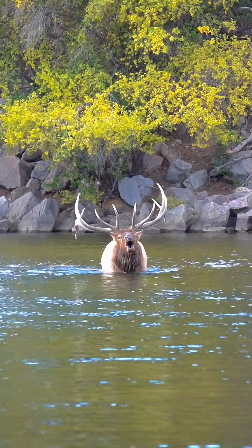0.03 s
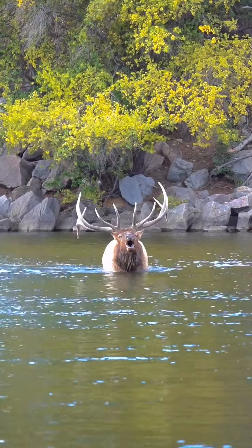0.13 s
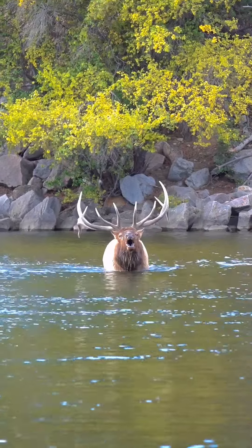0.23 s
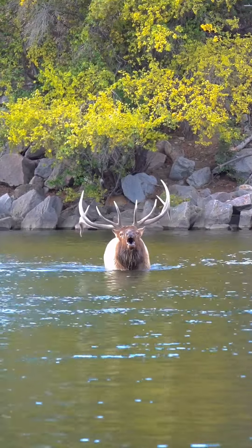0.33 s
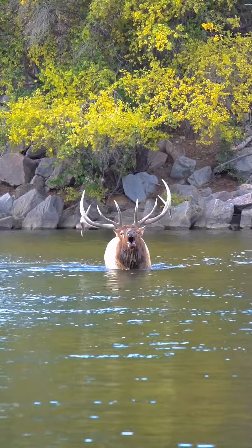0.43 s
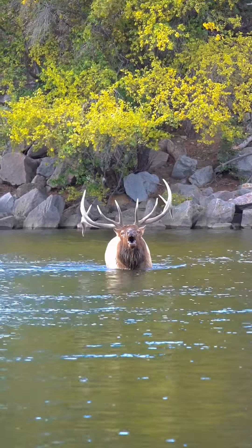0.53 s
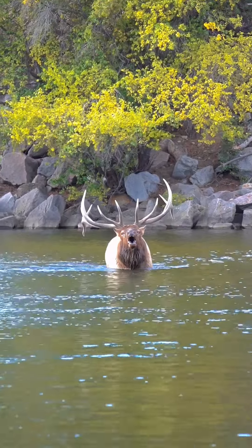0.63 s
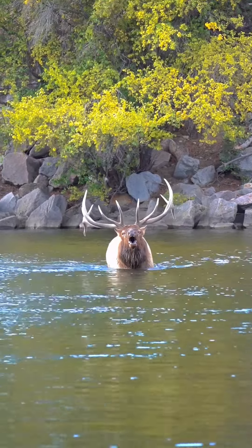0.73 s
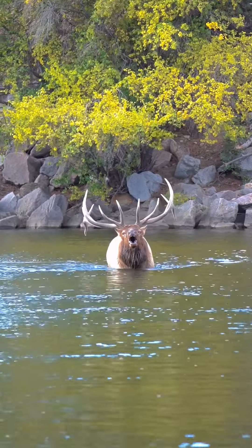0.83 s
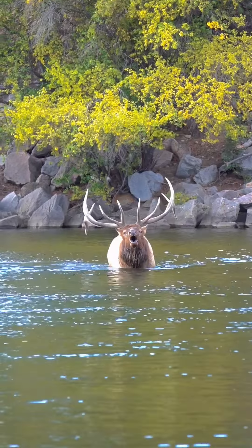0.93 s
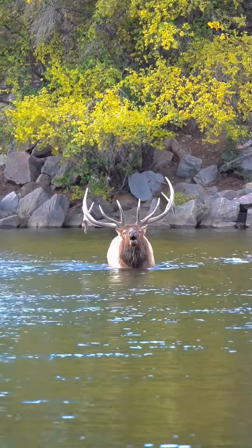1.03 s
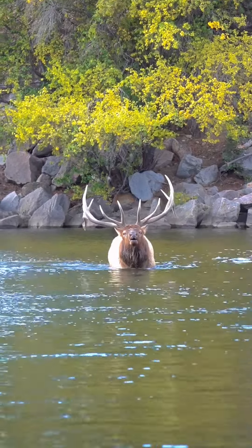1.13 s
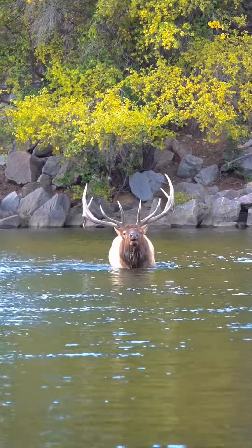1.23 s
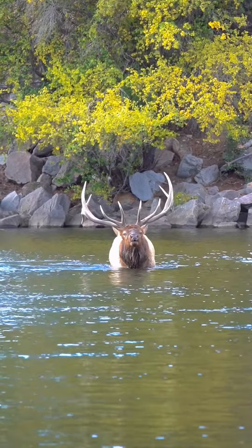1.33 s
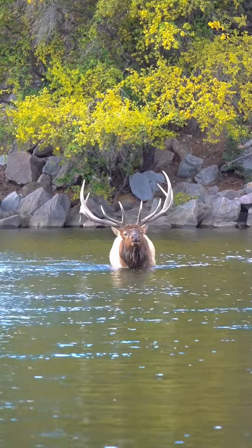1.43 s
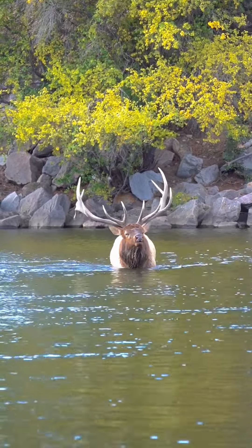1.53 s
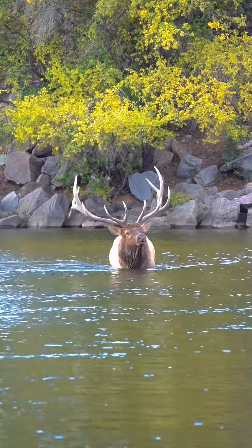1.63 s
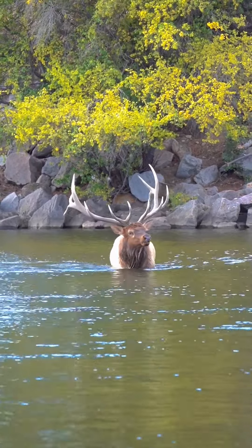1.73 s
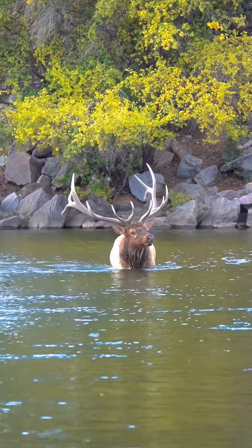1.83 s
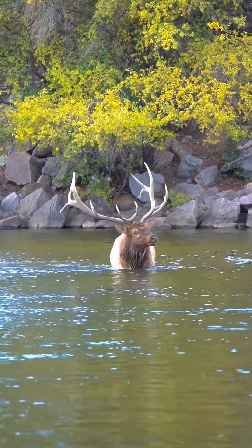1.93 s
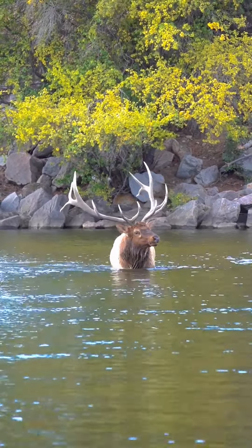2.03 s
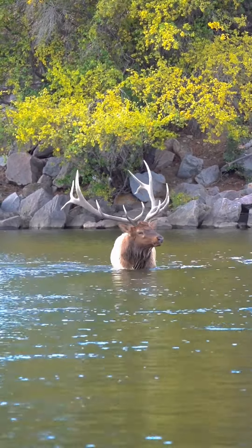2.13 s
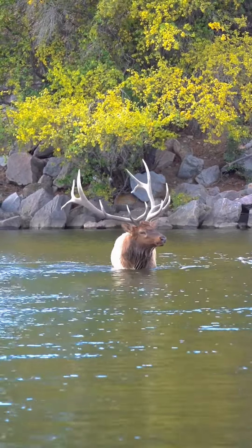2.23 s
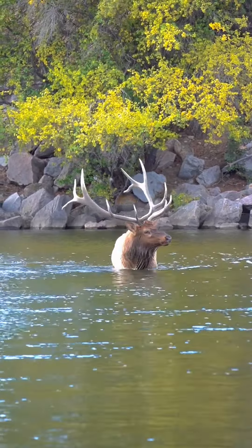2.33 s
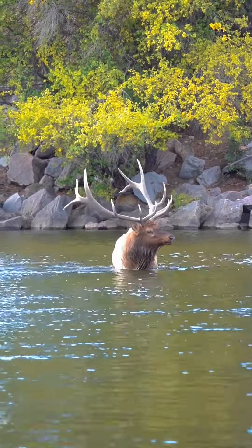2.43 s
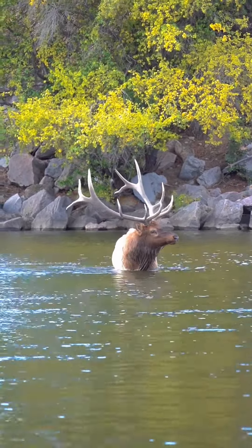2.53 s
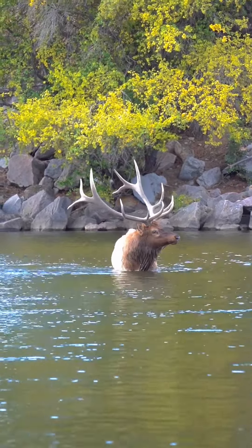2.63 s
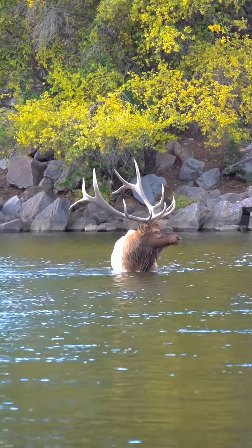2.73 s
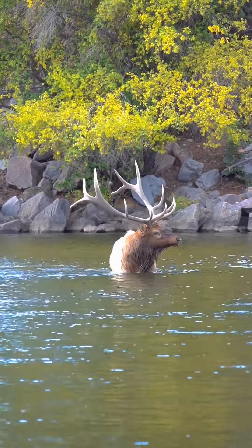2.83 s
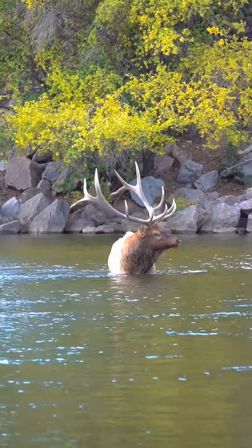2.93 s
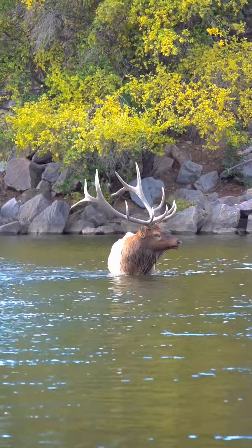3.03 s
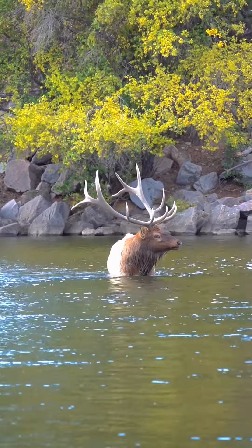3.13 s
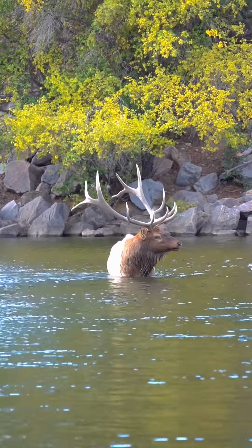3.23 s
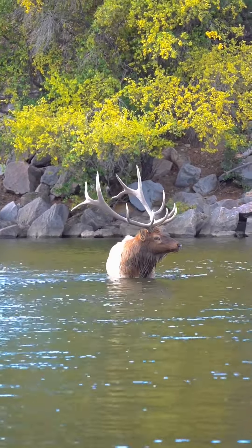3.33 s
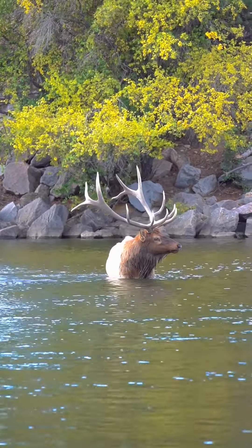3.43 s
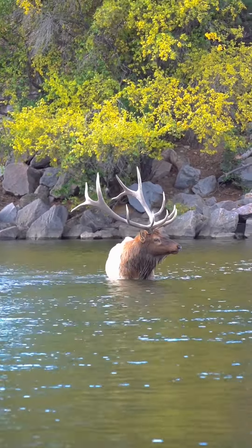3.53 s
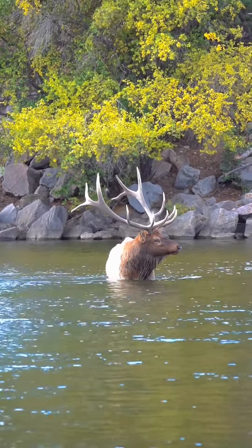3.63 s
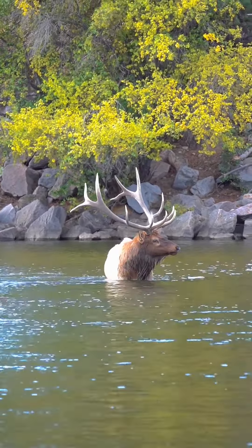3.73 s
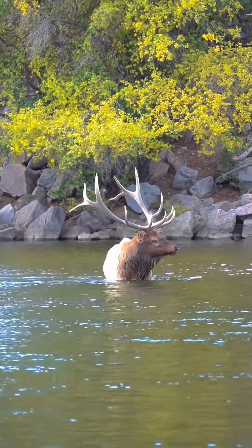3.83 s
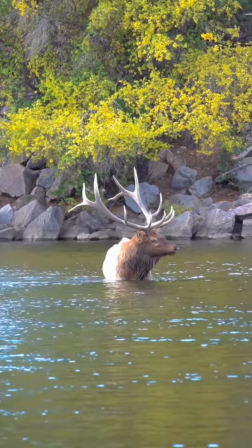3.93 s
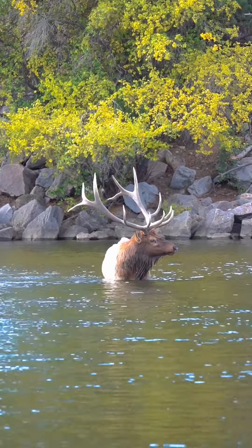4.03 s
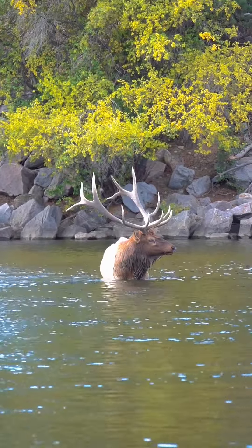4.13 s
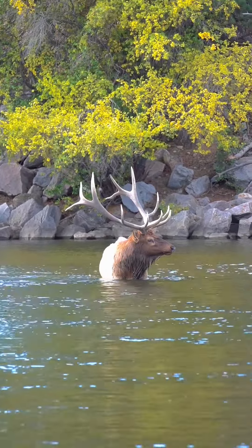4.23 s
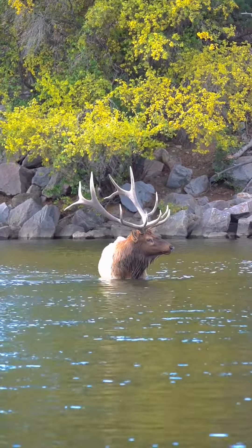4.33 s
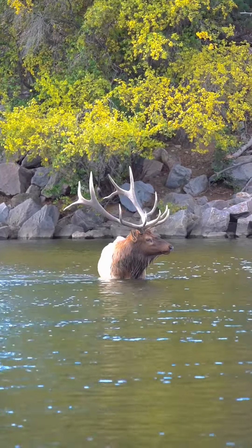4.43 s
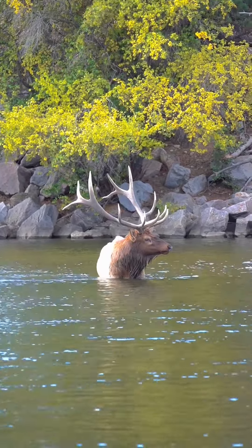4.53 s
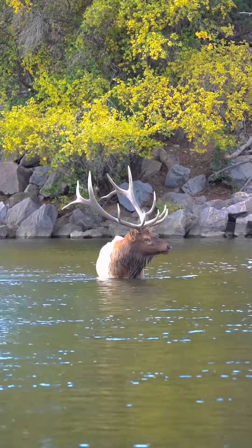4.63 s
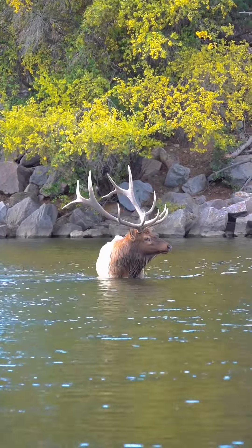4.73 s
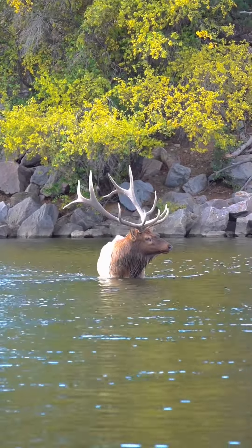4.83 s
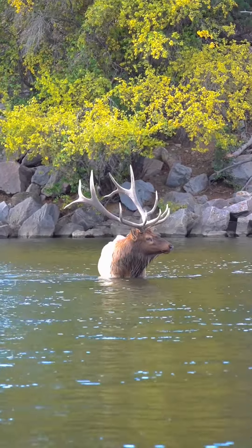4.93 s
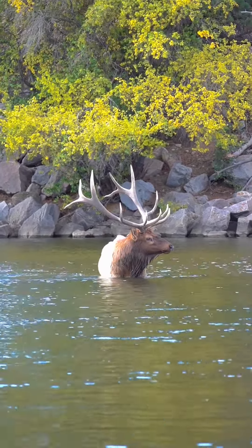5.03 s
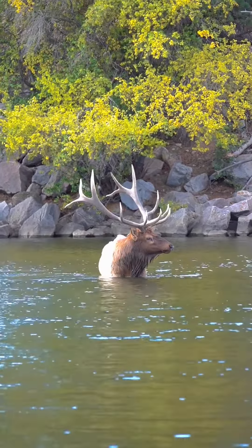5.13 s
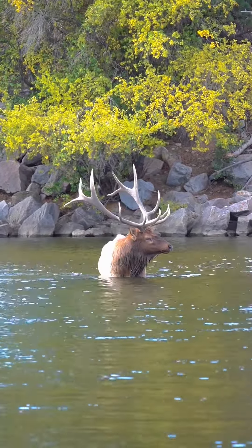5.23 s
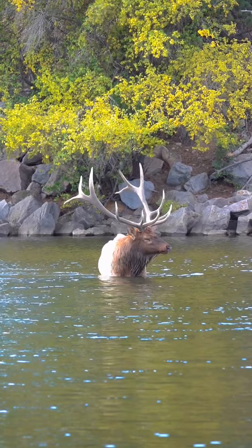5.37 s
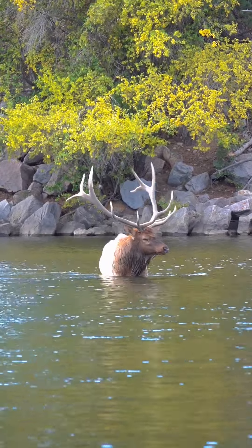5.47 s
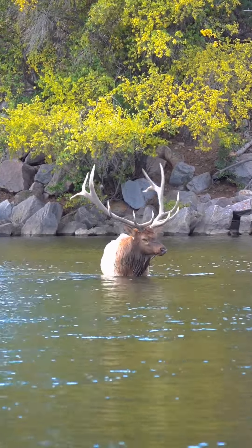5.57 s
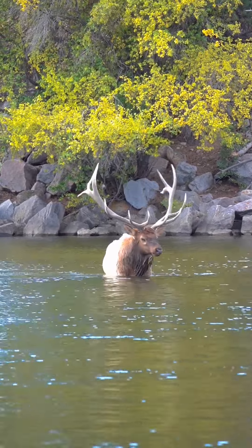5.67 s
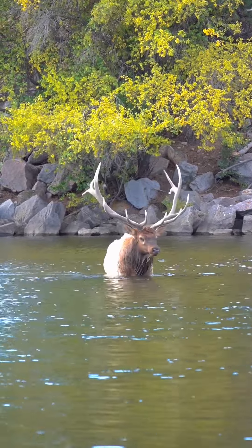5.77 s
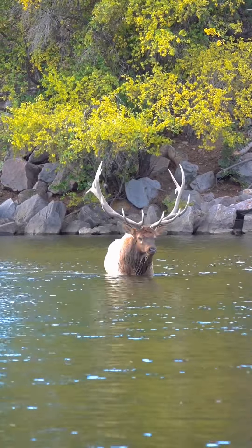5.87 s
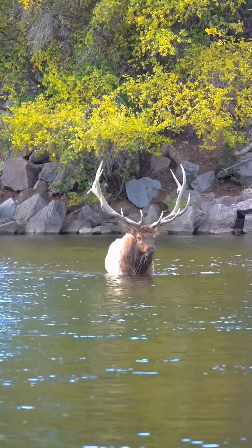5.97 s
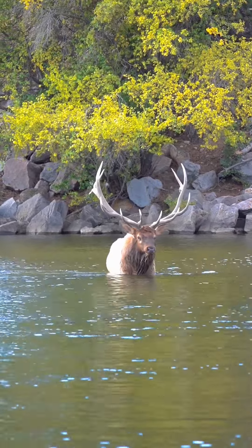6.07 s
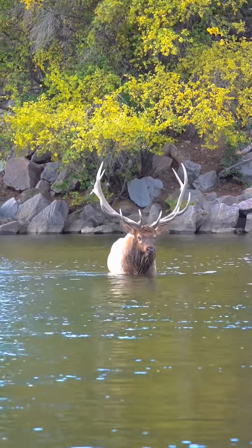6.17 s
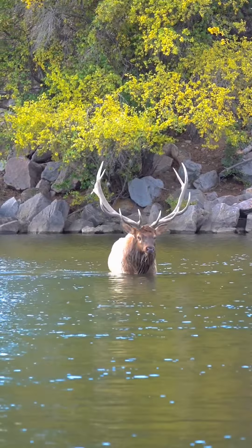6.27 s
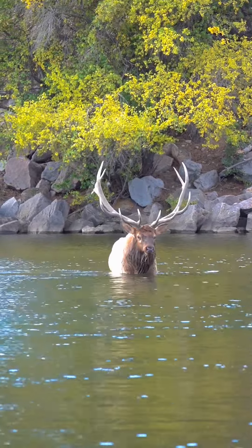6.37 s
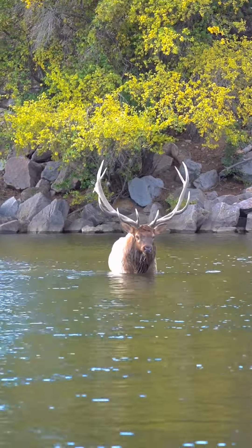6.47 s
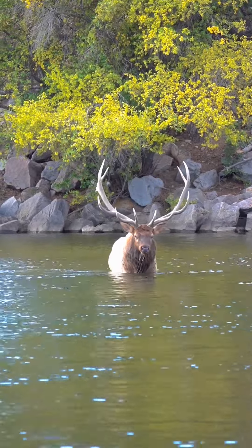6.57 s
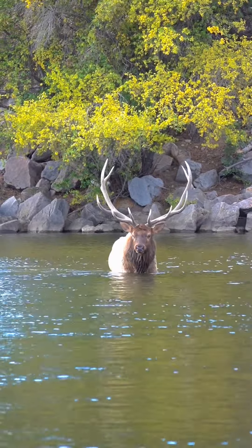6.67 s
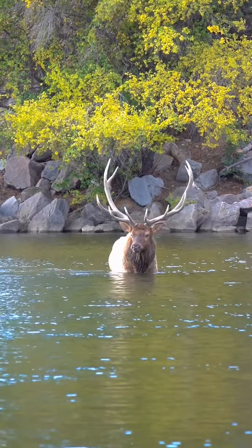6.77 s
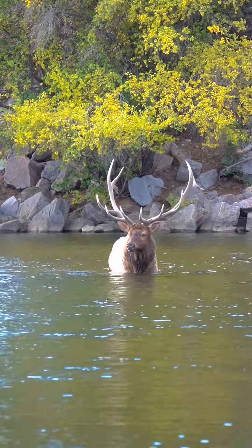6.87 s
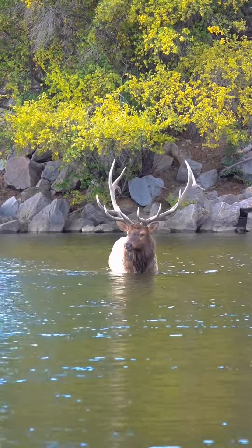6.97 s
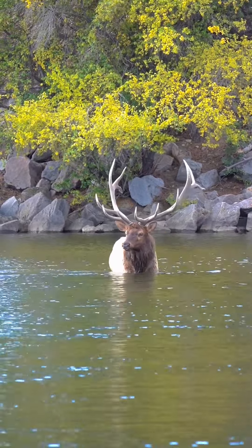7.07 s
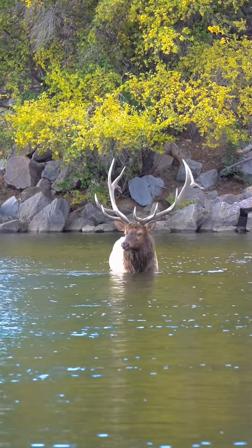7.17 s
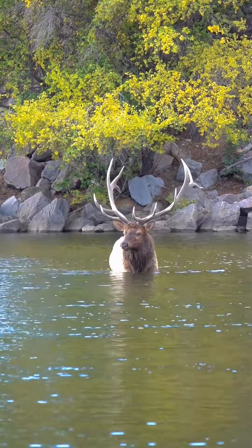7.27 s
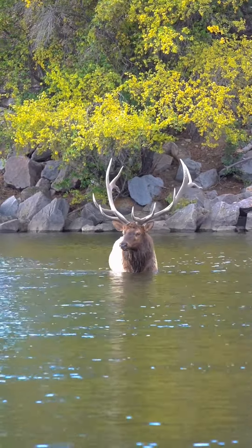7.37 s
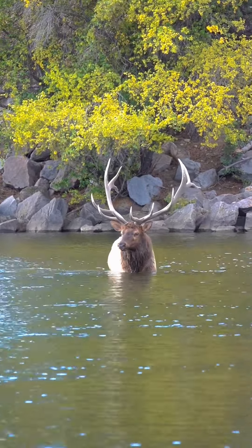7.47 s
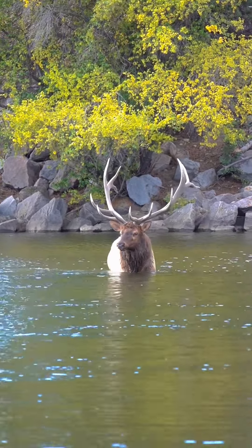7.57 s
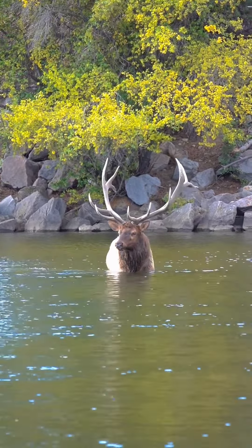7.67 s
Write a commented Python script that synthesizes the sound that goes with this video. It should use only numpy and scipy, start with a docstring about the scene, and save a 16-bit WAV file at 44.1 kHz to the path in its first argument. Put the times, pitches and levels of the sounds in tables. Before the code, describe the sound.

A bull elk's breathy, high nasal whistle holds, then drops into a low moan and grunt, echoing across water over faint distant traffic.

```python
"""Bull elk calling at a lake

A bull elk standing in a lake ends its bugle: a breathy nasal whistle drops into a low moan and a grunt.
The whistle is a wavering tone with harmonics and breath noise; the moan is pulses shaped by the throat.
The grunt is short rings and a rush of air. Rocky banks return all three as scattered echoes.
Behind are far traffic (noise and engine drones), insects (narrow wandering tones), a small bird
(short arches of harmonics) and a puff of wind on the microphone ports (low noise)."""
import sys
import numpy as np
from scipy import signal
from scipy.fft import rfft, irfft, next_fast_len
from scipy.io import wavfile
from scipy.ndimage import uniform_filter1d

SR = 44100
rng = np.random.default_rng(int(sys.argv[2]) if len(sys.argv) > 2 else 0)


def wav_record(signal):
    """Record a signal, one row per channel, as 16-bit PCM in the file named by sys.argv[1]."""
    frames = np.transpose(np.atleast_2d(signal))
    bounded = np.clip(frames, -1, 1)
    # unit amplitude maps onto the largest positive 16-bit level
    quanta = np.round(bounded * 32767).astype(np.int16)
    wavfile.write(sys.argv[1], SR, quanta)


N = 339570
LEAD = 44100      # samples of call before time zero, whose echoes still arrive


def from_db(db):
    """Turn decibels into a gain."""
    return 10 ** (np.asarray(db) / 20)


def rms_one(x):
    """Scale a sound to an average (rms) level of 1."""
    return x / np.sqrt(np.mean(x ** 2) + 1e-20)


def in_time(rows, lead=0):
    """Draw each column of a table as a line through time."""
    s, *columns = np.transpose(rows)
    t = np.arange(-lead, N) / SR
    return [np.interp(t, s, column) for column in columns]


def at_hz(points, hz):
    """Read a (frequency, value) table at any frequency, on a logarithmic frequency scale."""
    table_hz, values = np.transpose(points)
    return np.interp(np.log(hz), np.log(table_hz), values)


def sounding(rows, fade_s=.012, from_start=False):
    """1 while a table lasts, fading at its ends; from_start leaves out the fade-in."""
    t = np.arange(-LEAD, N) / SR
    fade_out = np.clip((rows[-1][0] - t) / fade_s, 0, 1)
    if from_start:
        return fade_out
    return fade_out * np.clip((t - rows[0][0]) / fade_s, 0, 1)


def drift(rate, size=N):
    """A smooth random line of spread 1; a higher rate [changes per s] moves faster."""
    # made at one fortieth of the sample rate, then joined by straight lines
    r = np.exp(-80 * np.pi * rate / SR)
    noise = rng.standard_normal(size // 40 + 2002)
    slow = signal.lfilter([1], [1, -2 * r, r * r], noise)[2000:]
    return np.interp(np.arange(size) / 40, np.arange(len(slow)), rms_one(slow))


def swells(centres, halves, levels_db):
    """Add bell-shaped rises and falls into one gain curve."""
    t = np.arange(N) / SR
    bells = np.broadcast(centres, halves, levels_db)
    return sum(from_db(db) * np.exp(-((t - s) / half) ** 2) for s, half, db in bells)


def stereo(mid, side, alike):
    """Mix two independent noises so that left and right are alike by a chosen share."""
    return np.sqrt(1 + alike) * mid + np.sqrt(1 - alike) * side * [[1], [-1]]


def narrow_noise(hz, width_hz, alike, size=N):
    """A few unsynchronised sources: a tone that wanders in a narrow band about a moving pitch."""
    lowpass = signal.butter(2, width_hz, fs=SR, output="sos")
    slow = signal.sosfilt(lowpass, rng.standard_normal((2, 2, size)))
    swing = slow[0] + 1j * slow[1]
    swing = swing / np.sqrt(np.abs(swing) + 1e-9)     # evens out the level
    turn = np.exp(2j * np.pi * np.cumsum(hz * np.ones(size)) / SR)
    mid, side = (swing * turn).real
    return rms_one(stereo(mid, side, np.clip(alike, 0, 1)))


def resonance(x, hz, width_hz):
    """A ringing cavity: a band-pass of gain 1 on top."""
    r = np.exp(-np.pi * width_hz / SR)
    top = np.array([1, 0, -1]) * (1 - r * r) / 2
    return signal.lfilter(top, [1, -2 * r * np.cos(2 * np.pi * hz / SR), r * r], x)


def throat(x):
    """Throat and nose cavities side by side, each applied twice for deep valleys between them."""
    # cavities: (frequency [Hz], width [Hz], relative level [dB])
    cavities = [(618.6, 80, -7), (880, 120, -22.5), (1280, 360, -22.5), (1530, 56, -16.5), (1845, 210, -6),
                (2245, 273, 3), (2960, 100, -64.5), (4720, 360, -22.5), (5230, 760, -32),
                (7140, 1100, -34.5), (8400, 3800, -41.5)]
    out = 0
    for k, (hz, width_hz, db) in enumerate(cavities):
        ringing = resonance(resonance(x, hz, width_hz), hz, width_hz)
        out = out + from_db(db) * ringing * (-1) ** k     # neighbours have opposite signs
    return out


def whistle():
    """A jet of air makes a tone with breath noise; turbulence just above the tone shakes its harmonics."""
    # the whistle's course: (time [s], pitch [Hz], tone level [dB], breath level [dB])
    course = [(0, 2075, -13.5, -24.5), (.2, 2043, -12.5, -23), (.42, 2051, -16, -25.5),
              (.53, 2053, -13, -23), (.64, 2048, -15, -24.5), (.725, 2022, -12.5, -23.5),
              (.8, 1998, -14, -33.5), (.88, 2003, -14.5, -33.5), (.96, 1996, -18.5, -41.5),
              (1.045, 2007, -15.5, -39.5), (1.1, 2004, -18.5, -34), (1.128, 1955, -22.5, -29.5),
              (1.148, 1877, -26.5, -33), (1.165, 1795, -20.5, -32), (1.18, 1757, -23.5, -29),
              (1.2, 1770, -30, -38.5)]
    # harmonics 2 to 5 against the tone: (level in a clean jet [dB], level in full turbulence [dB])
    harmonic_levels = [(-7, -22), (-32, -23.5), (-33.5, -32), (-42.5, -40.5)]
    waver_hz, waver_rate = 3.1, 49.5     # pitch spread, changes per s
    smear = .55                          # share of breath turbulence on the upper harmonics
    flutter_db, flutter_rate = 4.5, 90   # level spread in full turbulence, changes per s
    wander_db, wander_rate = 7.5, 4.1    # slow level spread in a clean jet, changes per s
    jitter_rad = .35                     # phase wobble in full turbulence, multiplied by each harmonic
    closing_s, closing_db_per_s = 1.0, 250   # when the muzzle starts closing, loss after that
    lock_hz = 1985     # below this the jet slips off the nasal resonance and loses its top harmonics
    size = N + LEAD

    pitch, tone_db, breath_db = in_time(course, lead=LEAD)
    breath = from_db(breath_db) * rms_one(throat(rng.standard_normal(size)))
    pitch = pitch + waver_hz * drift(waver_rate, size=size)
    turn = np.exp(2j * np.pi * np.cumsum(pitch) / SR)
    tone = np.sqrt(2) * from_db(tone_db)

    # strong breath beside a weak tone means more turbulence
    against = np.maximum(tone, 3 * from_db(breath_db))
    turbulence = 3 * from_db(breath_db) / against
    band = signal.butter(3, [2050, 2550], "band", fs=SR, output="sos")
    near = signal.sosfilt(band, breath)
    near_turn = signal.hilbert(near, next_fast_len(len(near)))[:len(near)]
    shaken = turn + smear * near_turn / against
    shaken = shaken / np.sqrt(np.abs(shaken) + 1e-9)     # the jet saturates
    shaken = shaken * np.exp(1j * jitter_rad * turbulence * drift(41, size=size))

    closing_db = closing_db_per_s * np.maximum(np.arange(-LEAD, N) / SR - closing_s, 0)
    slip_db = np.maximum(lock_hz - pitch, 0) / 4
    upper = 0
    for number, (clean_db, rough_db) in enumerate(harmonic_levels, start=2):
        db = tone_db + clean_db + (rough_db - clean_db) * turbulence
        if number >= 3:
            db = db + wander_db * (1 - turbulence) * drift(wander_rate, size=size) - slip_db
        if number >= 4:
            db = db - closing_db     # the closing muzzle dulls the fourth and fifth harmonics
        db = db + flutter_db * turbulence * drift(flutter_rate, size=size)
        upper = upper + np.sqrt(2) * from_db(db) * (shaken ** number).real
    return (tone * turn.real + upper + breath) * sounding(course, fade_s=.025, from_start=True)


def moan():
    """Vocal fold pulses and rasp go through the throat; the chest carries the fundamental."""
    # vocal folds: (time [s], pitch [Hz], fundamental level [dB], overtones level [dB], roughness [0-1])
    folds = [(0.9, 194.2, -44, -46, .3), (0.93, 202.4, -46, -35, .3), (0.962, 184.8, -44, -34, .25),
             (1.06, 205.4, -36, -24.5, .12), (1.095, 211, -39, -35, .3), (1.134, 186.6, -32, -27, .3),
             (1.18, 178, -32, -32, .3), (1.225, 174.0, -36, -48, .3)]
    flicker_db, rasp_cut_hz = 3, 900     # spread of the overtone level, top of the rasp noise
    pitch, fundamental_db, overtones_db, rough = in_time(folds, lead=LEAD)
    rough = np.clip(rough, 0, 1)
    phase = 2 * np.pi * np.cumsum(pitch) / SR
    pulses = sum(np.cos(k * phase) / k ** 2.2 for k in range(2, 9))
    lowpass = signal.butter(3, rasp_cut_hz, fs=SR)
    rasp = rms_one(signal.lfilter(*lowpass, rng.standard_normal(len(phase))))
    gated = (1 + np.cos(phase)) * rasp     # each cycle lets a puff of noise through
    voiced = throat((1 - rough) * pulses + .15 * rough * gated)
    voiced = voiced / np.sqrt(uniform_filter1d(voiced ** 2, size=900) + 1e-12)     # level it out
    overtones = from_db(overtones_db + flicker_db * drift(30, size=N + LEAD)) * voiced
    chest = np.sqrt(2) * from_db(fundamental_db) * np.cos(phase)
    return (overtones + chest) * sounding(folds)


def grunt():
    """The jet breaks up and sets one throat resonance after another ringing, with a dull rush of air."""
    # rings: (start [s], length [s], frequency [Hz], peak level before the wobble [dB])
    ring_table = [(1.2, .04, 1330, -35), (1.208, .05, 900, -33), (1.238, .026, 645, -18.5),
                  (1.265, .025, 630, -22), (1.264, .034, 268, -19.5), (1.255, .04, 480, -31),
                  (1.27, .03, 170, -27)]
    # air through the opening throat: (time [s], level [dB])
    rush = [(1.17, -47.5), (1.21, -29.5), (1.25, -31), (1.29, -32.5), (1.34, -53)]
    rush_cut_hz = 1500
    t, rings = np.arange(-LEAD, N) / SR, 0
    unsteady = np.cumsum(.03 * drift(60, size=N + LEAD)) / SR + t     # time that runs unevenly
    for start, length, hz, db in ring_table:
        arch = np.sin(np.pi * np.clip((t - start) / length, 0, 1))
        rings = rings + from_db(db) * arch * np.sin(2 * np.pi * hz * unsteady)
    rings = rings * (1 + .2 * drift(90, size=N + LEAD))
    air = signal.lfilter(*signal.butter(3, rush_cut_hz, fs=SR), rng.standard_normal(N + LEAD))
    air = rms_one(throat(air) + .26 * air)
    rush_db, = in_time(rush, lead=LEAD)
    return rings + from_db(rush_db) * air * sounding(rush)


def lakeside(call):
    """Direct sound, scattered returns from each bank and a thin valley tail, partly separate per ear."""
    # echoing banks: (delay [s], spread [s], level before filtering [dB])
    banks = [(.03, .03, -19), (.15, .05, -16), (.33, .12, -27), (.72, .2, -34)]
    # balance of the direct call: (frequency [Hz], left minus right [dB])
    balance = [(60, 0.0), (110, 0.0), (190, 0.0), (330, 0.0), (590, -0.5), (1050, -1.0), (1850, -1.5),
               (3280, 1.0), (5810, -1.0), (10300, -1.0)]
    # timing of the direct call: (frequency [Hz], phase by which left leads [radians])
    left_lead = [(0, 0), (1380, 0.2), (2500, -0.0), (3450, 0.1), (3960, 0.5), (4390, -0.1), (5250, -0.3),
                 (5600, -0.3), (5940, 1.0), (6200, -0.5), (7060, -0.1), (7920, -0.4), (8870, -0.0),
                 (10500, -0.0)]
    valley_db, valley_t60_s = -46, 1.2          # tail level before filtering, time to fall by 60 dB
    scatter_from_hz, echo_cut_hz = 800, 7900    # boulders scatter short waves best; top of near echoes
    air_cut_hz, near_s = 2300, .27              # top of far echoes, delay scale between near and far
    shimmer_db, shimmer_rate = 4, 16            # level spread, changes per s

    t = np.arange(2 * SR) / SR
    returns = 0
    for lag, spread, db in banks:
        returns = returns + from_db(2 * db) * np.exp(-((t - lag) / spread) ** 2) / (spread * SR)
    tail = from_db(2 * (valley_db - 60 * t / valley_t60_s)) / (.078 * valley_t60_s * SR)
    shared, own = rng.standard_normal(len(t)), rng.standard_normal((2, len(t)))
    scatter = np.sqrt(returns + tail) * (.8 * shared + .6 * own)
    scatter = signal.lfilter(*signal.butter(1, scatter_from_hz, "high", fs=SR), scatter)

    # long paths lose their treble in the air
    near = np.exp(-(t / near_s) ** 2)
    bright = signal.lfilter(*signal.butter(3, echo_cut_hz, fs=SR), scatter)
    dull = signal.lfilter(*signal.butter(3, air_cut_hz, fs=SR), scatter)

    size = next_fast_len(len(call) + len(t))
    hz = np.fft.rfftfreq(size, 1 / SR) + 1     # + 1 avoids the logarithm of zero
    side = np.array([[.5], [-.5]])
    pan = from_db(side * at_hz(balance, hz)) * np.exp(1j * side * at_hz(left_lead, hz))
    paths = np.array([pan, rfft(near * bright + (1 - near) * dull, size)])
    direct, echoes = irfft(rfft(call, size) * paths, size)[:, :, LEAD:LEAD + N]
    # moving air breaks the echoes up
    shimmer = np.array([drift(shimmer_rate), drift(shimmer_rate)])
    return direct + echoes * from_db(shimmer_db * shimmer)


def bird():
    """A small bird chips: short, hoarse nasal arches of four harmonics, each a little different."""
    # chips: (time [s], level [dB])
    chip_times = [(1.539, -61), (2.554, -73), (3.112, -62), (5.169, -71), (5.87, -65)]
    # pitch of a chip's unheard fundamental: (time from its start [s], frequency [Hz])
    chip_pitch = [(0, 730), (.012, 773), (.025, 720), (.045, 648)]
    # tone colour: (harmonic number, relative level [dB])
    chip_voice = [(4, 1), (5, 1.5), (6, -2), (7, -21)]
    s, hz = np.transpose(chip_pitch)
    t, out = np.arange(int(s[-1] * SR)) / SR, np.zeros(N)
    arch = np.sqrt(np.sin(np.pi * t / s[-1]))
    for (time, db), change in zip(chip_times, rng.normal(1, .012, len(chip_times))):
        phase = 2 * np.pi * np.cumsum(change * np.interp(t, s, hz)) / SR
        chip = sum(from_db(level_db) * np.sin(k * phase) for k, level_db in chip_voice)
        i = round((time - .008) * SR)     # sound begins 8 ms ahead of the listed time
        out[i:i + len(t)] += from_db(db) * chip * arch
    return out * (1 + .7 * drift(120))     # hoarseness


def insects():
    """Wings sing throbbing songs that start and stop, over far choruses that swell at random."""
    # songs: (start [s], length [s], wing pitch [Hz], level [dB])
    songs = [(1.242, .45, 3237, -59.5), (1.719, 0.71, 3250, -57.5), (2.651, 0.34, 3217, -55.5),
             (2.998, 0.1, 3250, -57), (3.25, 0.035, 3160, -56), (3.345, 0.053, 3210, -53.5),
             (3.515, 0.87, 3213, -54.5), (4.471, 0.042, 3250, -55), (4.605, .26, 3234, -55),
             (4.906, 0.28, 3266, -53), (5.305, 0.19, 3170, -56), (5.602, 0.35, 3184, -57.5),
             (5.968, .52, 3195, -56.5), (6.651, 0.09, 3200, -65), (7.176, 0.25, 3260, -54.5),
             (7.535, 0.14, 3310, -62), (2.497, 0.42, 2610, -65), (2.903, .17, 2650, -62),
             (3.396, .11, 2660, -58.5), (5.5, 0.12, 2640, -59), (6.8, 0.5, 2623, -57.5),
             (7.437, 0.07, 2670, -60), (2.42, .12, 4850, -70), (4.33, .16, 4750, -72),
             (7.02, .12, 4850, -78), (2.813, 0.22, 5780, -74), (3.28, 0.29, 5620, -73.5),
             (3.76, 0.24, 5900, -79.5), (4.194, 0.24, 5740, -75), (5.098, 0.16, 5450, -75),
             (6.486, .6, 5550, -78.5), (7.17, .2, 5500, -74.5), (7.405, 0.16, 5780, -71)]
    # far choruses: (frequency [Hz], half width [Hz], left-right likeness, level [dB])
    choruses = [(2624, 140, 0.43, -73), (3130, 43, 0.73, -67), (4870, 90, .6, -89.5),
                (5420, 83, 0.66, -85.5), (5820, 300, 0.41, -83)]
    edge_s, song_alike = .05, .8      # fade, left-right likeness
    width, wobble = .019, .01         # half width and pitch wobble as shares of the pitch
    throb_db, throb_rate = 3.2, 10    # level spread, changes per s
    out, t = np.zeros((2, N + SR)), np.arange(SR) / SR
    for start, length, hz, db in songs:
        shape = np.clip(np.minimum(t, length + edge_s - t) / edge_s, 0, 1)
        throb = throb_db * drift(throb_rate, size=SR) + 2.22 * drift(35, size=SR)
        pitch = hz * (1 + wobble * drift(6.3, size=SR))
        song = narrow_noise(pitch, width * hz, song_alike, size=SR)
        i = int((start - edge_s / 2) * SR)
        out[:, i:i + SR] += from_db(db + throb) * shape * song
    far = sum(from_db(db + 3.2 * drift(1)) * narrow_noise(*band) for *band, db in choruses)
    return out[:, :N] + far


def wind():
    """A puff of wind brushes the microphone ports: lumpy low noise, partly separate per channel."""
    # gusts: (loudest at [s], level [dB])
    gusts = [(0, -41), (.35, -31.5), (.72, -34), (.97, -45.5), (1.15, -55)]
    gust_s, cut_hz, alike = .14, 134, .72     # half length, top of the noise, left-right likeness
    band = signal.butter(2, [25, cut_hz], "band", fs=SR, output="sos")
    mid, side = signal.sosfilt(band, rng.standard_normal((2, N)))
    low = from_db(1.9 * drift(16)) * stereo(mid, side, alike)
    loudest_s, levels_db = np.transpose(gusts)
    return swells(loudest_s, gust_s, levels_db) * rms_one(low)


def lorries():
    """Heavy vehicles swell and fade as deep drones, each at its own pitch, over a faint steady hum."""
    # vehicles: (loudest at [s], half length [s], engine pitch [Hz], level [dB])
    vehicles = [(1.95, 0.35, 60.8, -44), (3.035, 0.34, 55, -41.5), (4.694, 0.56, 47.13, -39),
                (5.75, 0.25, 45, -47), (7.297, 0.47, 63.2, -40.5)]
    # hum: (frequency [Hz], half width [Hz], level [dB])
    hum_hz, hum_width_hz, hum_db = (121, 5, -48)
    width_hz, alike = 3, 1     # half width of a drone, left-right likeness
    drones = 0
    for s, half, hz, db in vehicles:
        drones = drones + swells(s, half, db) * narrow_noise(hz, width_hz, alike)
    return drones + from_db(hum_db) * narrow_noise(hum_hz, hum_width_hz, alike)


def banded_noise(spectrum, top_hz, patchy_db):
    """Third-octave bands of stereo noise, each with its own level, flicker and likeness; rms 1."""
    # likeness of the two channels: (frequency [Hz], left-right likeness)
    likeness = [(60, .998), (130, .998), (260, .995), (540, 0.97), (1140, 0.95), (2370, 0.76), (4940, 0.21),
                (10300, 0.34)]
    edges = top_hz / 2 ** np.arange(0, np.log2(top_hz / spectrum[0][0]), 1 / 3)
    white = rng.standard_normal((2, 2, N + LEAD))     # neighbouring bands use different noise
    out = 0
    for k, (high, low) in enumerate(zip(edges, edges[1:])):
        band = signal.butter(2, [low, high], "band", fs=SR, output="sos")
        mid, side = signal.sosfilt(band, white[k % 2])[:, LEAD:]
        hz = np.sqrt(low * high)
        alike = np.clip(at_hz(likeness, hz), -1, 1)
        gain = from_db(at_hz(spectrum, hz) + patchy_db * drift(1.6))
        out = out + gain * stereo(mid, side, alike)
    return rms_one(out)


def road():
    """Far traffic: low noise for the rumble and higher noise for the tyre hiss."""
    # traffic levels: (time [s], rumble level [dB], tyre hiss level [dB])
    traffic = [(1.5, -37, -40.5), (2.3, -37, -41), (3.2, -36.5, -40.5), (4.3, -37.5, -40), (5.1, -38, -40),
               (5.85, -36, -39.5), (6.6, -37, -42), (7.7, -39, -40.5)]
    # rumble spectrum: (frequency [Hz], relative level per Hz [dB])
    rumble_spectrum = [(12, -39.5), (20, -23), (43, -4.5), (125, -1.5), (166, -8), (195, -4), (252, -11.5),
                       (296, -17.5), (367, -18), (500, -20.5), (650, -39), (1100, -120)]
    # tyre hiss spectrum: (frequency [Hz], relative level per Hz [dB])
    tyre_spectrum = [(180, -42.5), (300, -5.5), (463, -4.5), (694, 1.5), (1010, 3.5), (2400, -22.5),
                     (2970, -7.5), (3200, -52.5), (3550, -49), (3830, -43), (5160, -37), (5650, -45),
                     (6960, -51), (10800, -42.5), (14000, -89), (22000, -120)]
    rumble_db, tyres_db = in_time(traffic)
    rumble = from_db(rumble_db) * banded_noise(rumble_spectrum, top_hz=658.0, patchy_db=1.0)
    tyres = from_db(tyres_db) * banded_noise(tyre_spectrum, top_hz=11190, patchy_db=-0.5)
    return rumble + tyres


def scene():
    """Elk and its echoes over bird, insects, wind and traffic."""
    elk = lakeside(whistle() + moan() + grunt())
    return elk + bird() + insects() + wind() + lorries() + road()


def record(dry):
    """Cut the top steeply above 10.9 kHz."""
    return signal.sosfilt(signal.ellip(12, .5, 80, 10900, fs=SR, output="sos"), dry)


dry = scene()
out = record(dry)
wav_record(out)
```